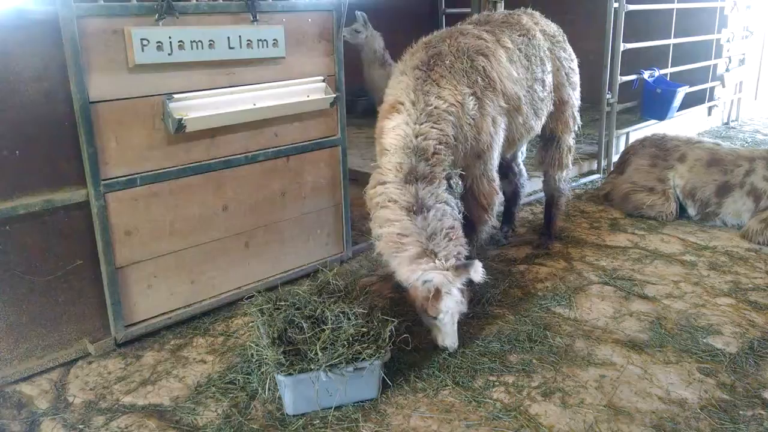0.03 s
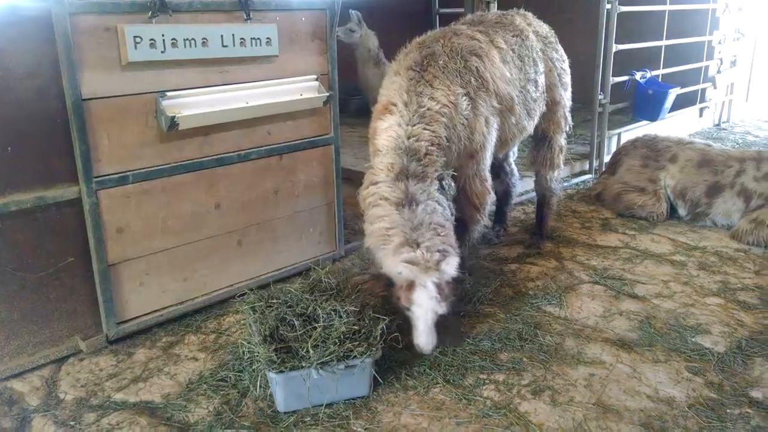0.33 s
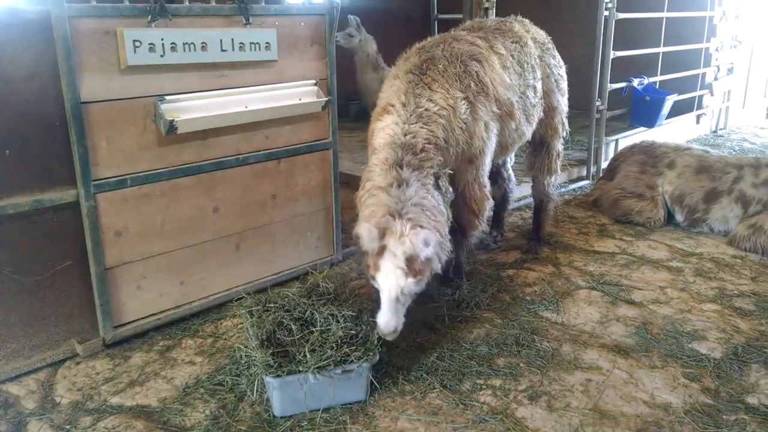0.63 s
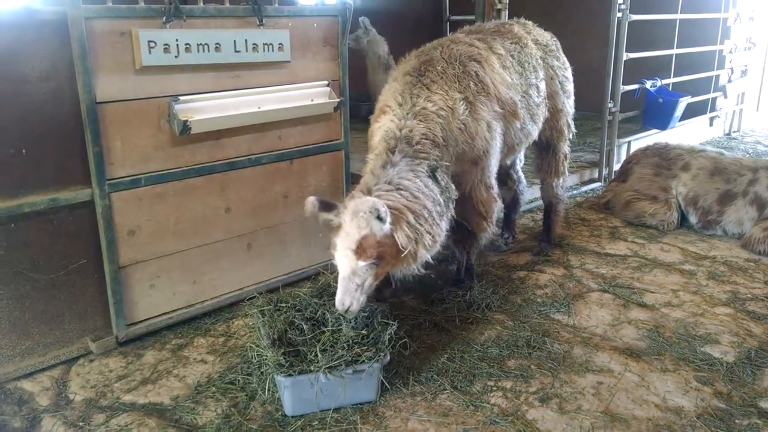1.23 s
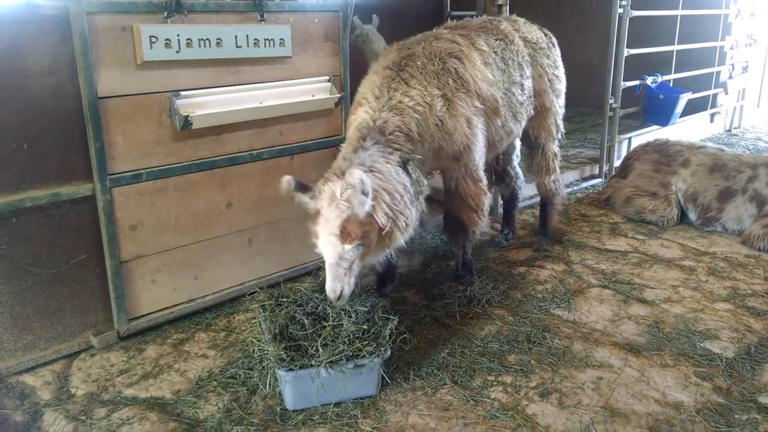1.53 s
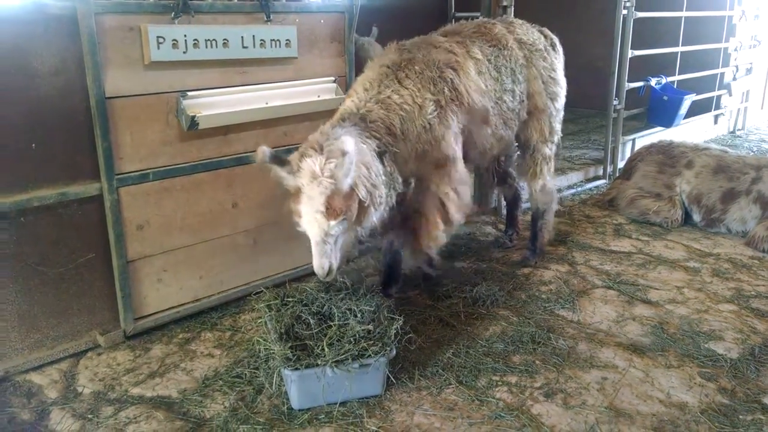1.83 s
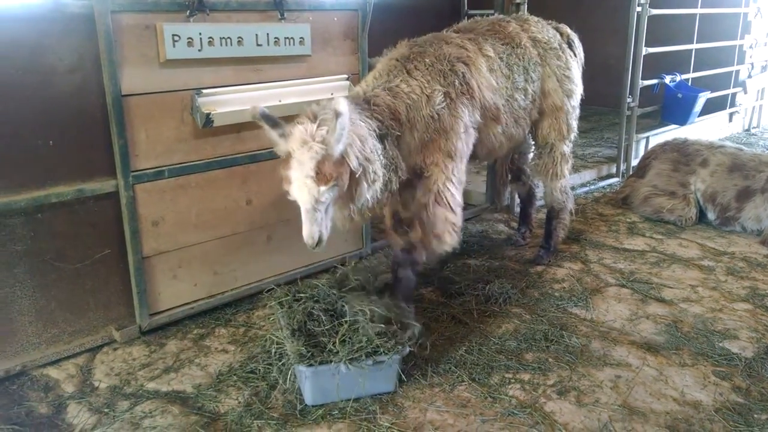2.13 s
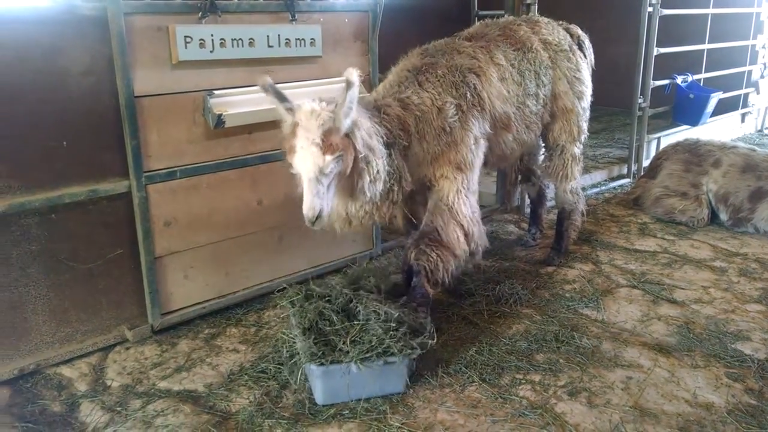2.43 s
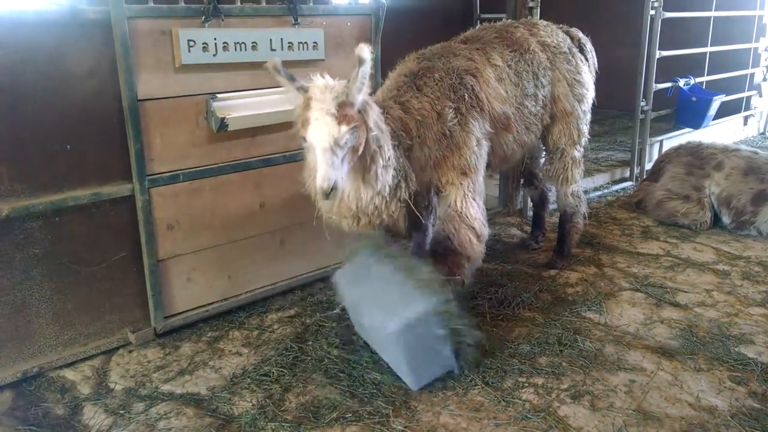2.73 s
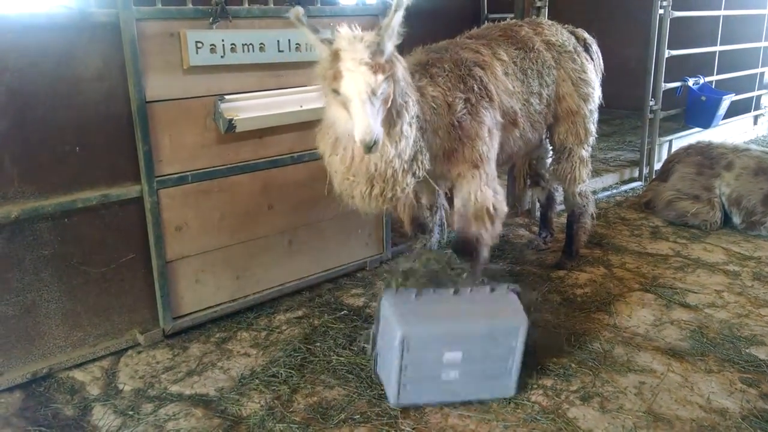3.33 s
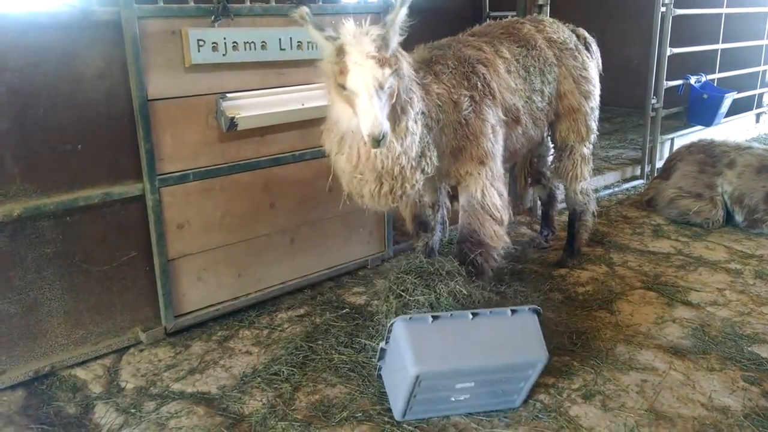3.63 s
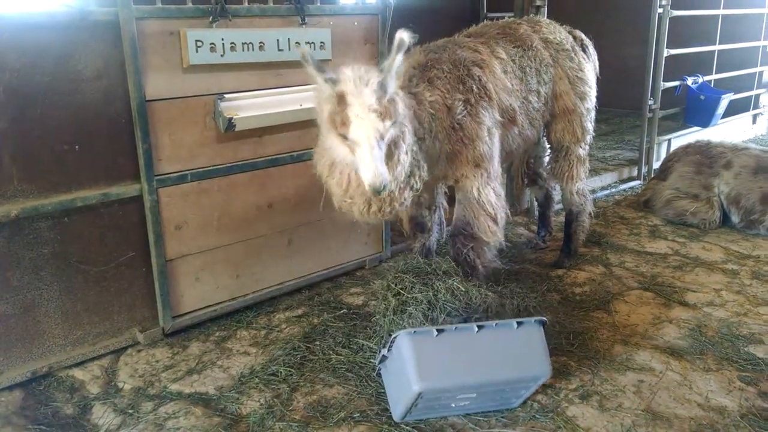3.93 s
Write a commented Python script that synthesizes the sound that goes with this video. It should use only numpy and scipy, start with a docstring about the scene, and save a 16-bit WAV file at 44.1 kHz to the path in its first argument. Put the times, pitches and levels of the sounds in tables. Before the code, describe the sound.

A plastic tub clacks under a llama's foot, then tips over with a rustle of hay and lands with a hollow, booming knock. A large fan drones steadily throughout, heard in wide stereo on a phone in a barn.

```python
"""In a barn, over the roar and hum of a big fan, a llama paws at a plastic tub of hay.
The dry stalks rustle as swarms of tiny clicks. Its foot clacks on the rim, then flips the tub with a
squeak: hay slides out and the empty tub lands with a hollow knock and a boom from its base.
Wooden walls add a short, dull tail. A phone with two microphone ports fades in and widens the stereo."""
import sys
import numpy as np
from scipy import signal
from scipy.fft import rfft, irfft
from scipy.io import wavfile

SR = 44100
rng = np.random.default_rng(int(sys.argv[2]) if len(sys.argv) > 2 else 0)


def inscribe(sig):
    """Save sig as 16-bit PCM at rate SR to the path in sys.argv[1].

    A 1-D sig is mono; a 2-D sig holds one channel per row.
    Samples are clipped to [-1, 1] before scaling.
    """
    pcm = np.round(np.clip(np.atleast_2d(sig).T, -1, 1) * 32767)
    wavfile.write(sys.argv[1], SR, pcm.astype(np.int16))


N = 176400
T, HZ = np.arange(N) / SR, np.maximum(np.fft.rfftfreq(N, 1 / SR), 1)

# roar of the fan's air (f/Hz, level/dB per Hz)
FAN_ROAR = [(20, -82), (32, -76), (45, -72), (66, -58), (86, -69.5), (120, -52), (147, -56), (178, -45.5),
            (225, -53), (295, -49), (460, -54), (620, -51.5), (740, -54), (810, -57), (1000, -58.5),
            (1500, -68), (1900, -69.5), (2300, -70), (3100, -71.5), (3900, -74.5), (4500, -79), (8000, -84),
            (13000, -89), (16000, -90)]
# hum of blades and motor (f/Hz, level/dB)
FAN_HUM = [(66.2, -44.5), (132.4, -38.5), (198.6, -34.5), (264.9, -38), (331.1, -37), (397.7, -34.5),
           (597.1, -39.5), (744, -38), (887.7, -41.5), (1176, -51)]
# stereo image of the fan at the two ports (f/Hz, correlation/0-1, left minus right/dB)
FAN_IMAGE = [(30, .4, -1), (66, 0.9, -5.5), (173, 0.84, -3.5), (258, 0.2, -5), (404, 0.55, -4),
             (690, 0.62, -4), (940, 0.63, -1.5), (1350, 0, 2), (2050, 0, -3), (4020, 0.01, 0)]
# tone colour of dry stalks (f/Hz, level/dB per Hz)
HAY_COLOUR = [(300, -72), (1200, -76.5), (2500, -72.5), (3800, -73.5), (5000, -78), (9000, -74),
              (12000, -73.5), (14500, -72.5), (16000, -68)]
# swells as hay is nosed, trodden and spilt (peak t/s, rise/s, fall/s, level/dB)
HAY_SWELLS = [(1.14, 0.046, 0.035, -10.5), (1.22, .02, .03, -23), (1.79, .04, 0.042, -12.5),
              (1.94, 0.021, 0.025, -14), (2.02, 0.025, .05, -1), (2.15, 0.079, 0.071, -3),
              (2.33, .05, 0.053, -10), (2.57, 0.049, 0.056, -13), (2.66, .02, 0.045, -8.5),
              (2.78, 0.046, 0.026, 0), (2.91, 0.085, .15, 1), (3.338, 0.09, 0.047, 0.6),
              (3.48, 0.066, 0.11, -10), (3.67, 0.087, .1, -15), (4.0, .06, .05, -6.5)]
# brief, very high ticks at 0.24 s and 2.66 s; in the other rows stalks snap (t/s, level/dB, low cut f/Hz)
HIGH_TICKS = [(.2416, -26, 11000), (1.6589, -31, 7000), (2.076, -27, 4000), (2.198, -22, 4000),
              (2.5579, -29, 6000), (2.6366, -29, 4000), (2.6606, -21, 10000), (3.4872, -21, 6000),
              (3.789, -33, 4000)]
# resonances of the foot dragging over the rim (f/Hz, width/Hz, level/dB)
SCRAPE_BANDS = [(1770, 110, -31), (4050, 350, -36), (7060, 2500, -40)]
# ringing modes of the plastic tub (f/Hz, level/dB, t60/s)
TUB_MODES = [(239, -2, 0.1), (308, 0.5, 0.074), (520, -1.5, 0.055), (750, 5, 0.018), (920, -9, 0.025),
             (1240, -1.5, 0.013), (1380, 0.5, 0.013), (1616, -5.5, 0.017), (1790, -8, 0.025),
             (2170, -1.5, 0.014), (3170, 0, 0.016), (3690, -1, 0.01), (4060, -1.5, 0.012),
             (6590, -17, 0.04), (8900, -7, 0.017)]
# hits on the tub (t/s, level/dB, low cut f/Hz, high cut f/Hz)
TUB_HITS = [(1.9892, -17, 1090, 16100), (1.9906, -14, 1100, 1400), (1.9919, -36, 3000, 14000),
            (1.9955, -31, 600, 10000), (2.0115, -33, 400, 12000), (2.0185, -29, 1500, 6000),
            (2.0315, -29, 1200, 5000), (2.7705, -26.5, 500, 3000), (2.7745, -17, 150, 550),
            (2.7905, -20, 250, 800), (2.902, -21, 80, 800), (3.3587, -19.5, 2700, 5160),
            (3.3604, -12.5, 550, 1290), (3.3648, -26, 1500, 4200), (3.3641, -11.3, 140, 680),
            (3.388, -23, 60, 280), (3.525, -31, 50, 250)]
# low end as the tub drops on the floor (t/s, thud level/dB, base boom level/dB)
TUB_DROPS = [(2.77, -35, -29), (2.91, -35, -25), (3.379, -35, -15), (3.525, -34, -25)]
# how much of the other port each channel subtracts (f/Hz, left share/0-1, right share/0-1)
CROSSFEED = [(540, 0.023, 0.016), (1140, 0.33, 0.82), (2320, 0.54, 0.4), (4760, 0.42, 0.36),
             (7160, 0.31, 0.097), (10100, 0.32, 0.45), (15000, 0.81, 0.56)]
# the whole mix fades in, then wavers slightly (t/s, level/dB)
MASTER_FADE = [(.088, -87), (.102, -12), (.3, -9.5), (.55, -6.5), (.9, -3), (1.15, -0.6), (1.36, 1.7),
               (1.53, -1.2), (1.75, 0.45), (1.93, 0.8), (2.08, -1.5), (2.27, 0.6), (2.44, -0.5),
               (2.58, 0.84), (3.15, -0.97), (3.3, -1.1), (3.68, -2.5), (3.85, 0.7), (4, -0.1)]


def undb(db):
    """Decibels to gain."""
    return 10 ** (np.asarray(db) / 20)


def curves(table):
    """The columns of a table as curves over log frequency."""
    hz, *columns = np.array(table, float).T
    return [np.interp(np.log(HZ), np.log(hz), c) for c in columns]


def eq(x, gain):
    """Filter by a gain for each frequency."""
    return irfft(rfft(x) * gain, N)


def passband(x, low_hz, high_hz):
    """Low cut and high cut, 12 dB per octave."""
    for hz, kind in ((low_hz, "high"), (high_hz, "low")):
        x = signal.sosfilt(signal.butter(2, hz, kind, fs=SR, output="sos"), x)
    return x


def wobble(rate_hz):
    """Smooth random modulation with a spread of 1."""
    w = eq(rng.standard_normal(N), np.exp(-(HZ / rate_hz) ** 2))
    return (w - w.mean()) / w.std()


def add(out, start, sound):
    """Mix a sound in at a time."""
    i = int(start * SR)
    out[:, i:i + sound.shape[-1]] += sound[..., :N - i]


def decay(t, t60):
    """An envelope that falls 60 dB in t60 seconds."""
    return np.exp(-np.log(1000) * t / t60)


def mode(t, hz, t60):
    """One struck resonance: a dying sine."""
    return decay(t, t60) * np.sin(2 * np.pi * hz * t)


def fan():
    """The bed: turbulent air with wavering blade and motor tones, leaning to the right."""
    flutter_db, swell_db, waver_db, pitch_drift = .87, .28, 2.5, .004
    correlation, balance_db = curves(FAN_IMAGE)
    spectrum = undb(curves(FAN_ROAR)[0]) * np.sqrt(SR / 2)
    split = np.sqrt([(1 + correlation) / 2, (1 - correlation) / 2])
    mid, side = eq(rng.standard_normal((2, N)), spectrum * split)
    roar = np.array([mid + side, mid - side]) * undb(flutter_db * wobble(25) + swell_db * wobble(5.2))
    hum = 0
    for hz, db in FAN_HUM:
        phase = 2 * np.pi * np.cumsum(hz * (1 + pitch_drift * wobble(7.75))) / SR
        hum += np.sqrt(2) * undb(db + waver_db * (wobble(3.7) - .5)) * np.sin(phase)
    return eq(roar + hum, undb([balance_db / 2, -balance_db / 2]))


def barn(x):
    """Wooden walls put a short, dull reverb behind the direct sound."""
    wet_db, predelay_s = -12.5, .005
    t = T[:SR]
    tail = passband(rng.standard_normal((2, SR)), 59, 5030) * decay(t, t60=.47) * (t > predelay_s)
    tail /= np.sqrt(np.sum(tail ** 2, axis=1, keepdims=True))
    return x + undb(wet_db) * signal.fftconvolve(x, tail, axes=1)[:, :N]


def hay():
    """Thousands of tiny stalk clicks swell with each movement, with snaps and two very high ticks."""
    clicks_per_s, spread_db, tick_s = 7000, 1.5, .00094
    power = 0
    for peak, rise, fall, db in HAY_SWELLS:
        width = np.where(T < peak, rise, fall)
        power += undb(db) ** 2 * np.exp(-((T - peak) / width) ** 2)
    size = undb(spread_db * np.minimum(rng.exponential(size=(2, N)), 6))
    clicks = (rng.random((2, N)) < clicks_per_s / SR) * size * rng.standard_normal((2, N))
    spectrum = undb(curves(HAY_COLOUR)[0]) * np.sqrt(SR / 2)
    out = eq(clicks / clicks.std() * np.sqrt(power), spectrum)
    t = T[:SR // 20]
    for start, db, low_hz in HIGH_TICKS:
        tick = rng.standard_normal((2, len(t))) * np.exp(-t / tick_s)
        add(out, start, undb(db) * passband(tick, low_hz, 16000))
    return out


def rim_scrape():
    """The foot sticks and slips on the rim as the tub flips: a brief squeak with a rasp on top."""
    peak_s, width_s, slip_hz, jitter = 2.78, .0062, 905, .03
    cycles = np.cumsum(slip_hz * (1 + jitter * wobble(400))) / SR
    slips = np.diff(np.floor(cycles), prepend=0)  # one pulse a cycle
    squeak = 0
    for hz, width_hz, db in SCRAPE_BANDS:
        resonance = 1 / (1 + 1j * (HZ / hz - hz / HZ) * hz / width_hz)
        ring = eq(slips, resonance)
        squeak += undb(db) * ring / ring.std()
    return squeak * np.exp(-((T - peak_s) / width_s) ** 2)


def tub():
    """Hits crack and ring the plastic: bright on the rim, with a thud and a boom when it lands flat."""
    crack_db, crack_s, correlation = 5, .0017, .6
    scatter_db, boom_rise_s = .5, .007
    out, t = np.zeros((2, N)), T[:SR // 2]
    modes = np.array([undb(db) * mode(t, hz, t60) for hz, db, t60 in TUB_MODES])
    for start, db, low_hz, high_hz in TUB_HITS:
        # each hit meets another spot and shifts the balance of the modes
        ring = undb(scatter_db * rng.standard_normal(len(modes))) @ modes
        centre = np.sqrt(correlation) * rng.standard_normal(len(t))
        spread = np.sqrt(1 - correlation) * rng.standard_normal((2, len(t)))
        crack = undb(crack_db) * (centre + spread) * np.exp(-t / crack_s)
        add(out, start, undb(db) * passband(ring + crack, low_hz, high_hz))
    thud = mode(t, hz=44, t60=.26)
    boom = mode(t, hz=114, t60=.32) * (1 - np.exp(-t / boom_rise_s))
    for start, thud_db, boom_db in TUB_DROPS:
        add(out, start, undb(thud_db) * thud + undb(boom_db) * boom)
    return out


def scene():
    """Tub, hay and scrape in the barn's reverb, over the fan bed."""
    return fan() + barn(tub() + hay() + rim_scrape())


def record(dry):
    """The phone widens by subtracting the delayed other port, fades in, soft-clips and cuts the top."""
    port_lag_s, ceiling, top_hz = .000389, .8, 15550
    share = np.array(curves(CROSSFEED))
    other_port = eq(dry[::-1], share * np.exp(-2j * np.pi * HZ * port_lag_s))
    wide = eq(dry - other_port, 1 / np.sqrt(1 + share ** 2))
    times, fade_db = np.array(MASTER_FADE).T
    faded = wide * undb(np.interp(T, times, fade_db)) * (T > times[0])
    clipped = faded / (1 + (faded / ceiling) ** 4) ** .25
    return signal.sosfilt(signal.ellip(10, .2, 80, top_hz, fs=SR, output="sos"), clipped)


dry = scene()
out = record(dry)
inscribe(out)
```